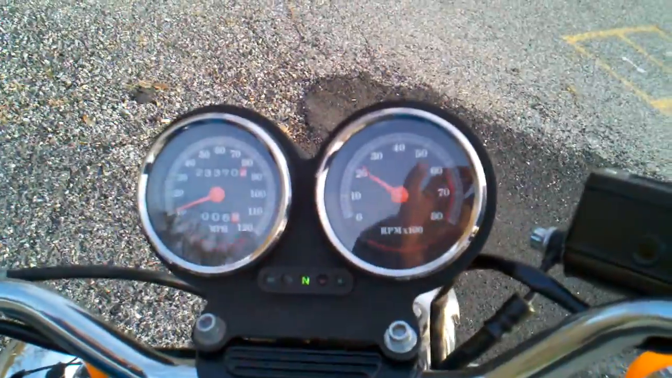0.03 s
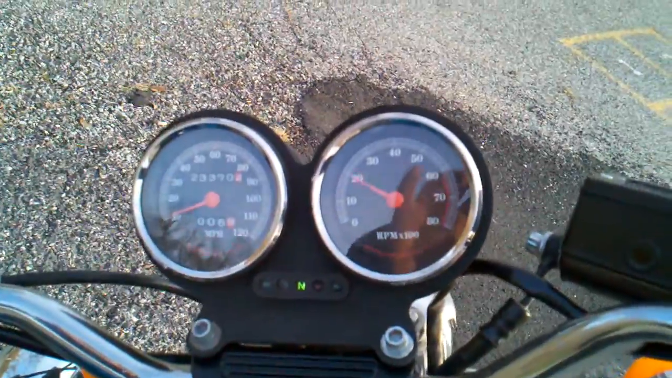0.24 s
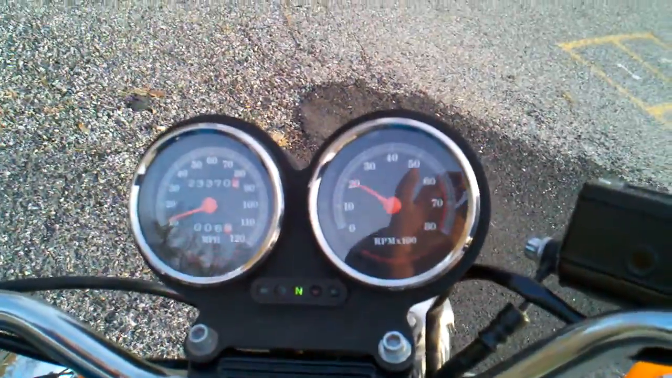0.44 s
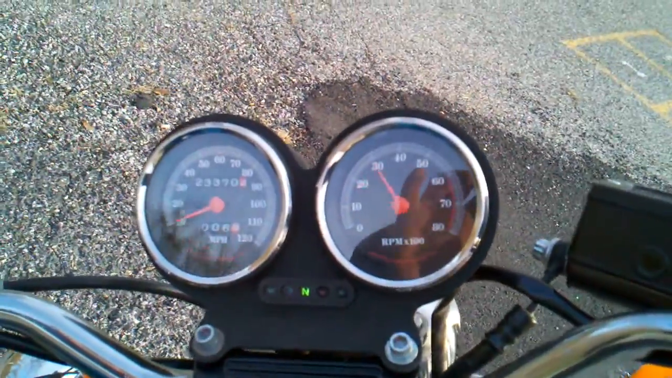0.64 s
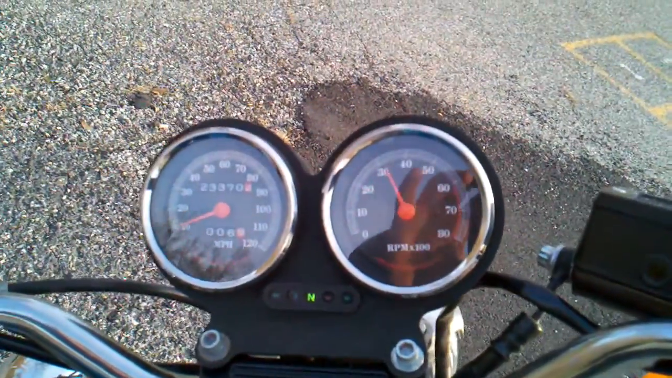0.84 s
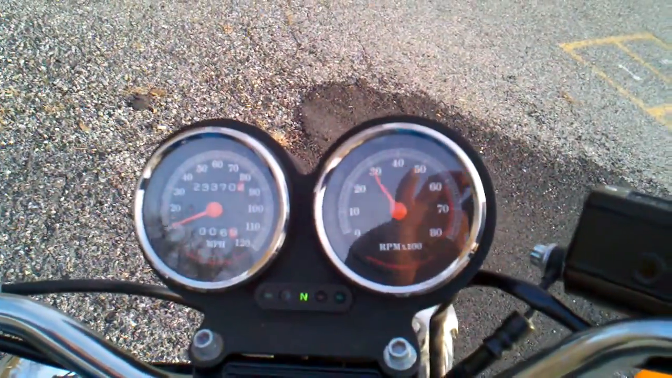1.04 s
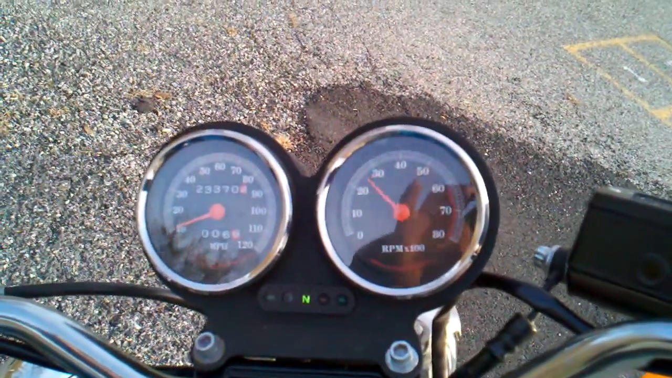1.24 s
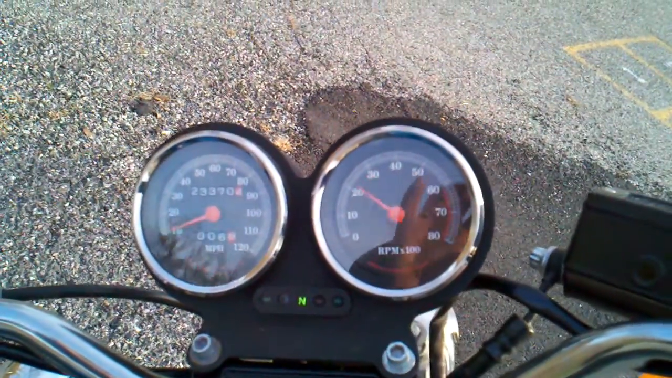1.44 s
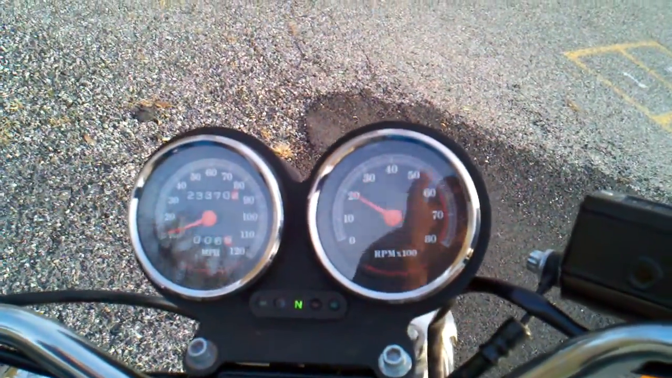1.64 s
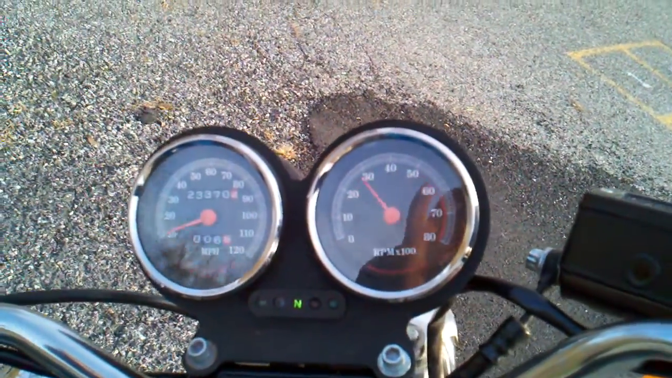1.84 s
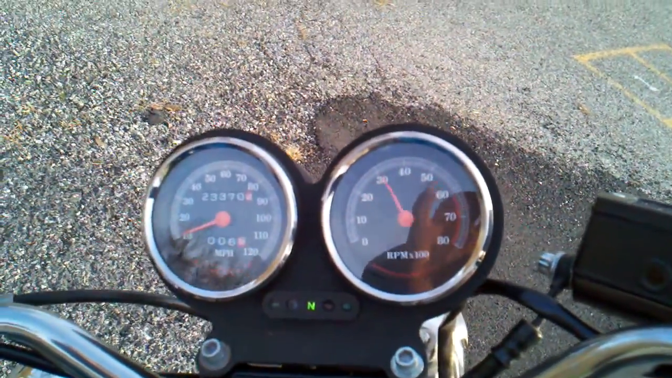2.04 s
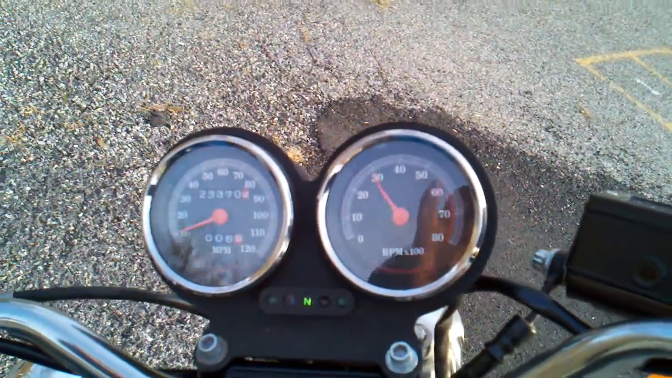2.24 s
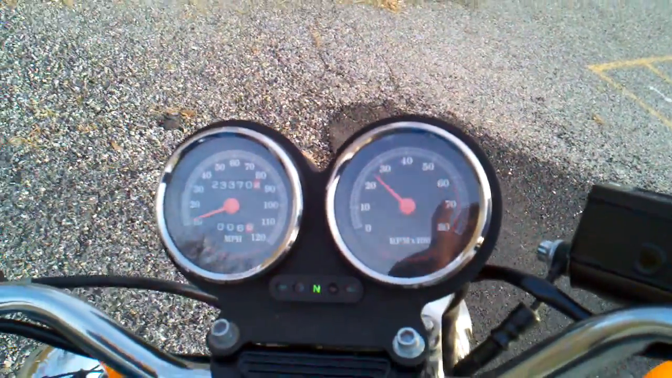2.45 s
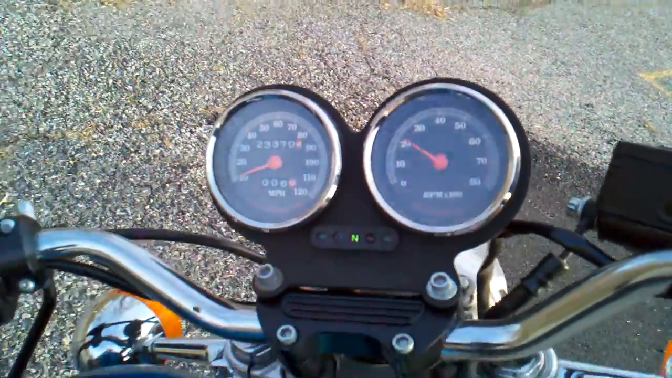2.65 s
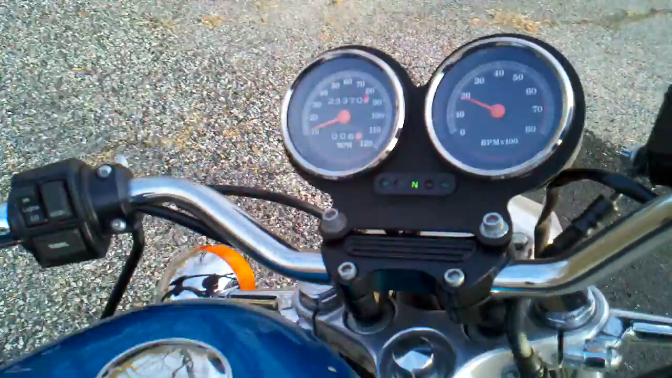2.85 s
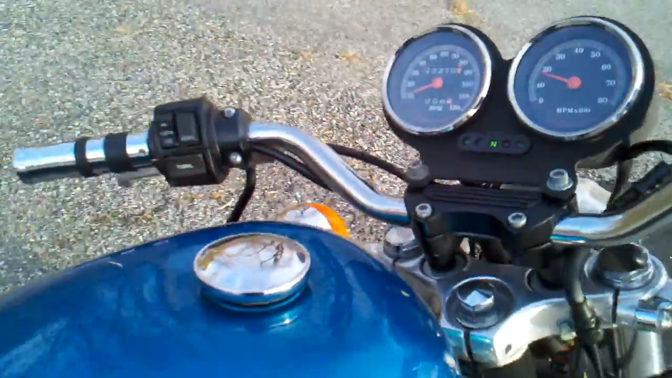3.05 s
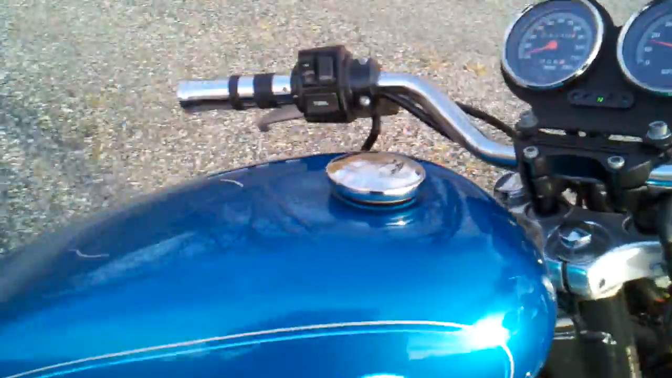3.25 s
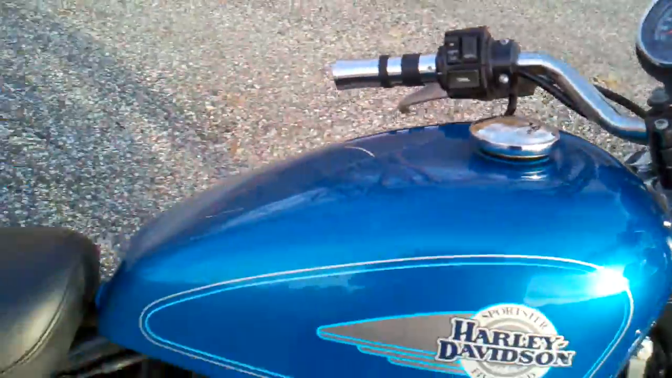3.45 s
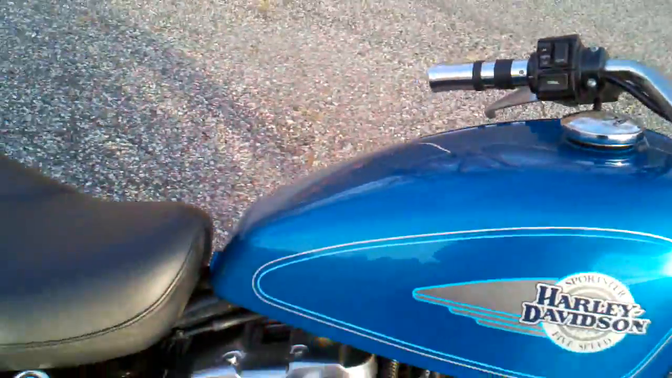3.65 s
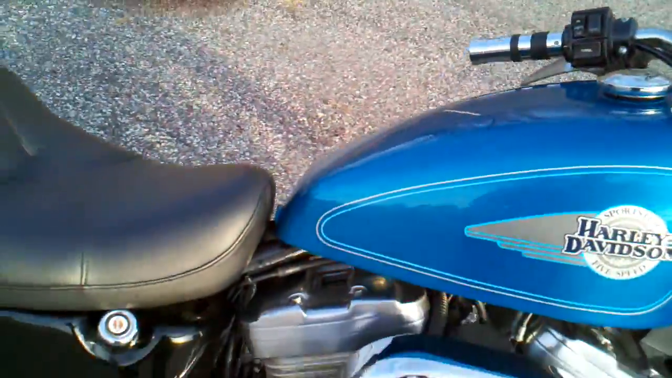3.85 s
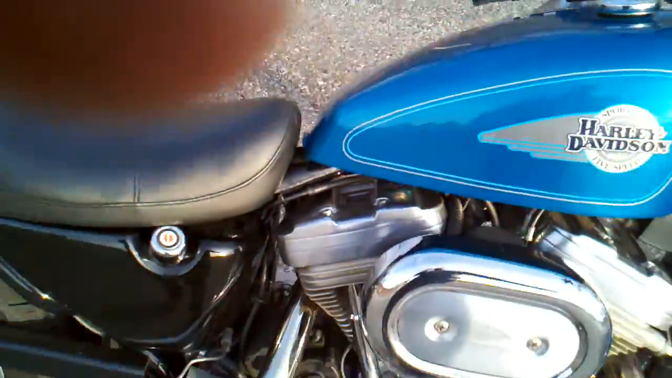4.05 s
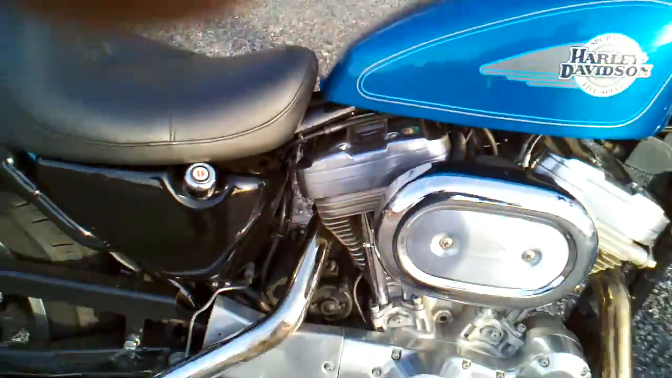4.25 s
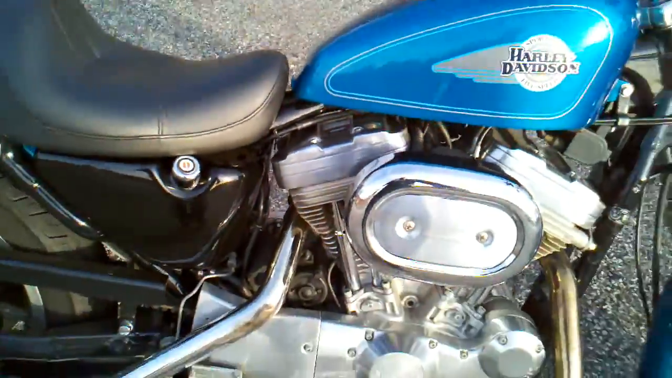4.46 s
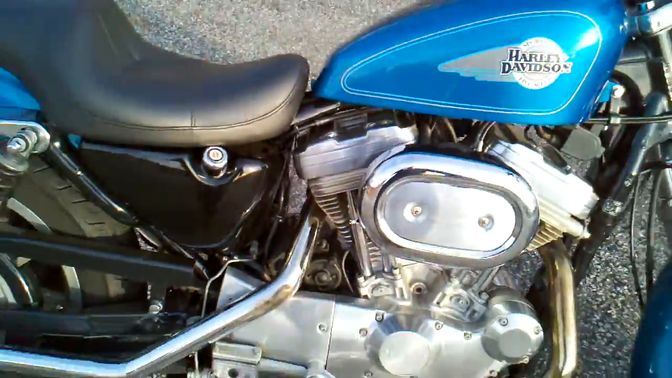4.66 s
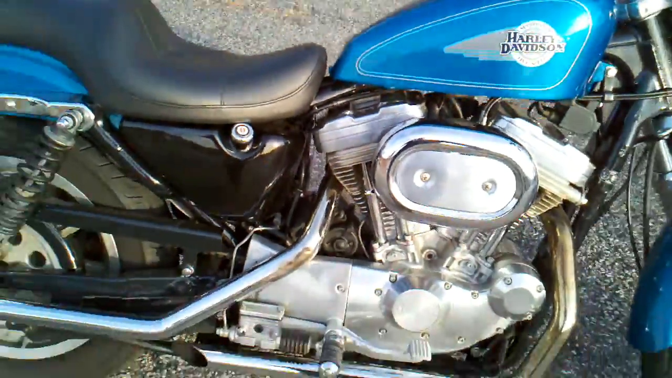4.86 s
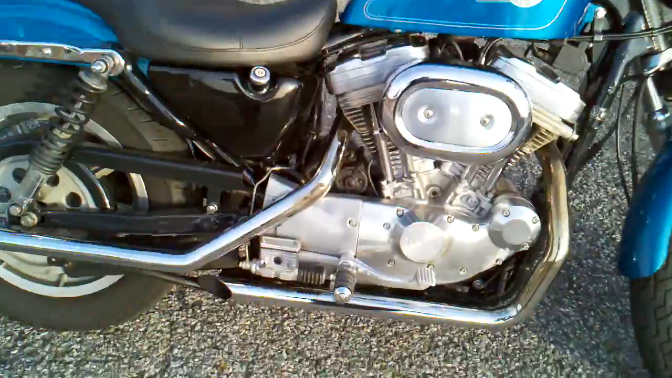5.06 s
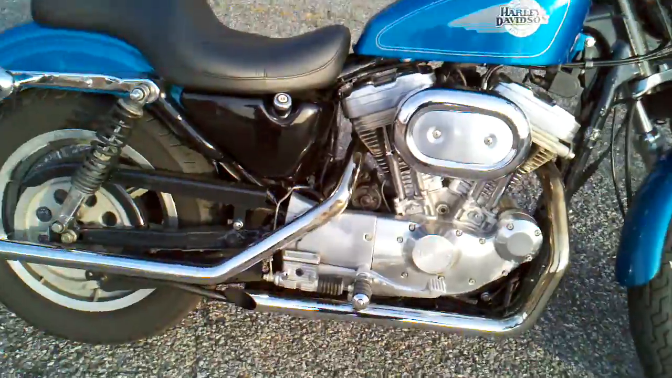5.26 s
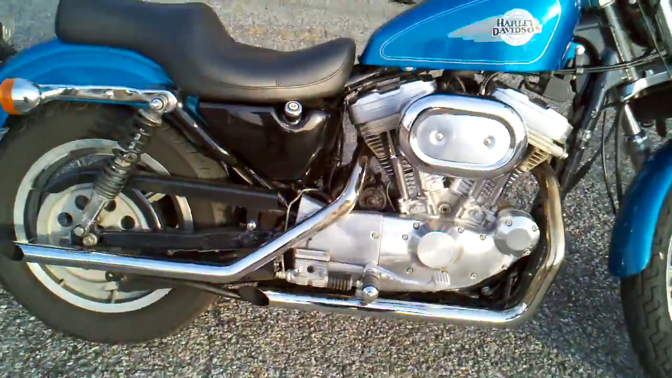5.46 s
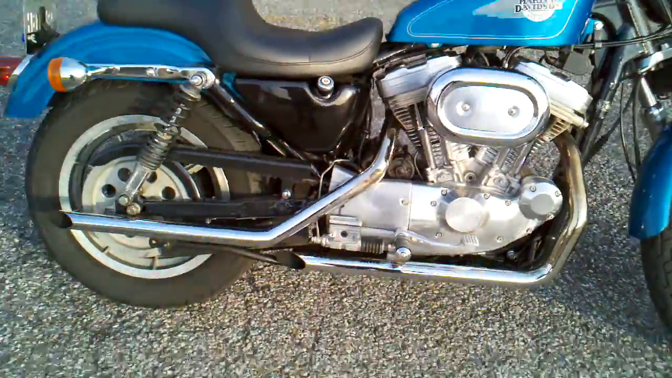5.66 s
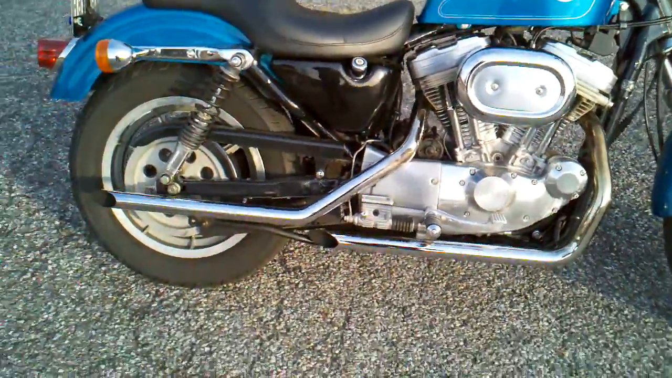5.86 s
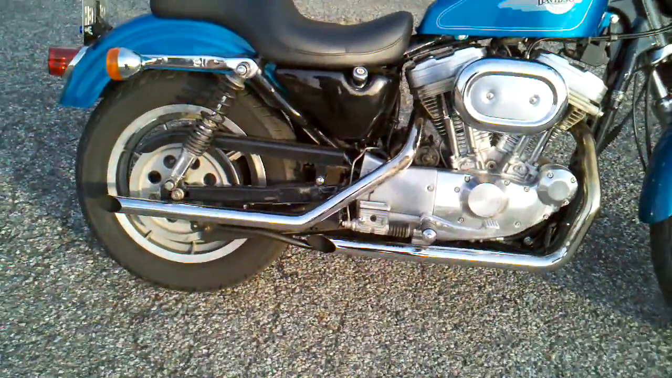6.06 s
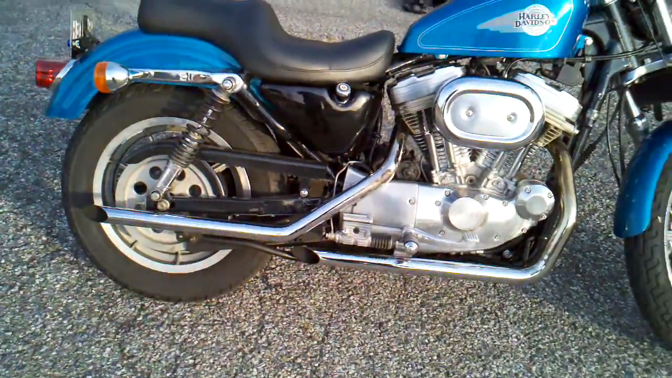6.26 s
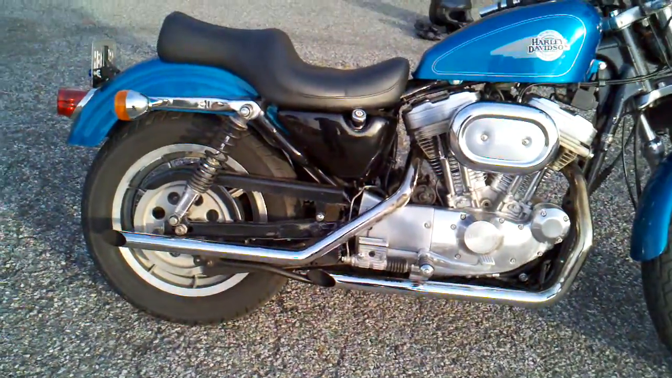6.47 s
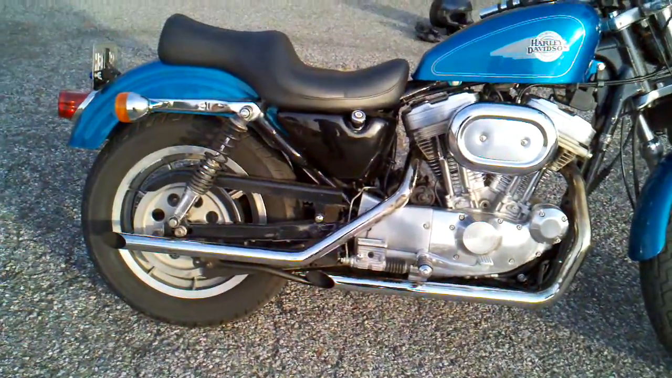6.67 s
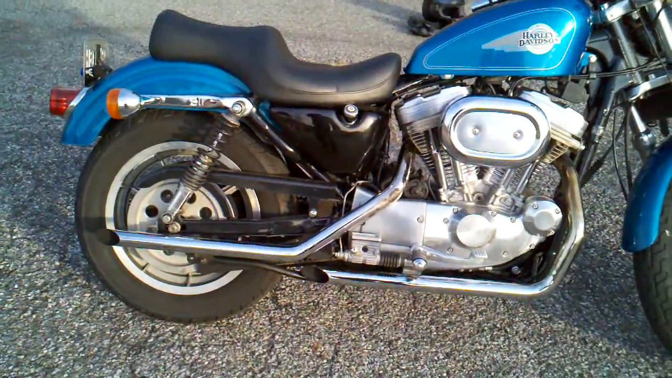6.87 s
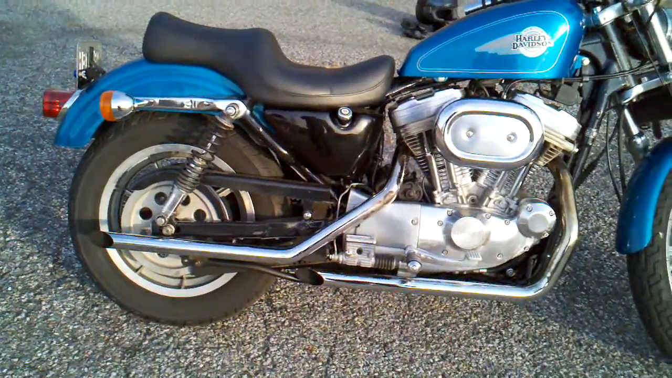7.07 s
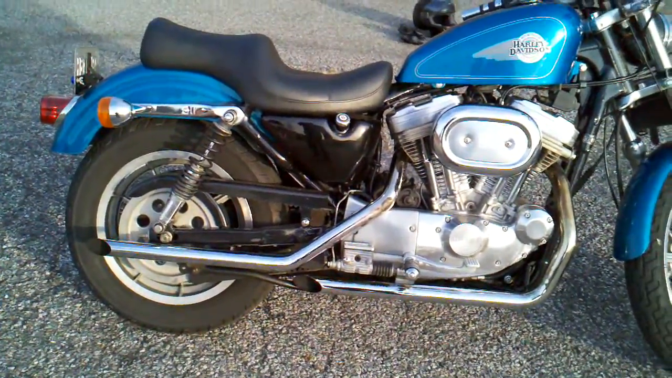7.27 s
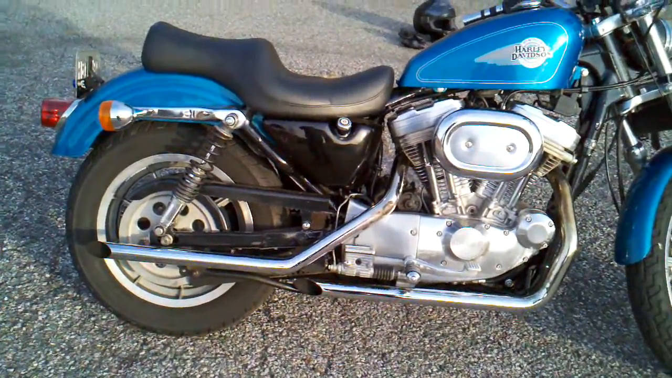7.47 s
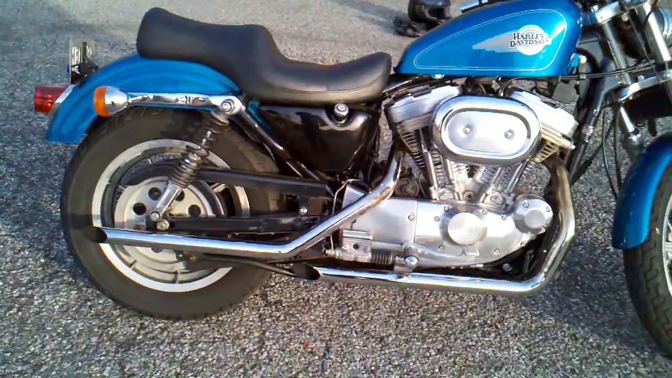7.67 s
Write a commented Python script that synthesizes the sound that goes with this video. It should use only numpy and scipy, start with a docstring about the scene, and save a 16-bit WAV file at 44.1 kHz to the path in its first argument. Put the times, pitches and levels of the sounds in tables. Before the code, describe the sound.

Close motorcycle engine: two short throttle barks with popping run-down, then a slow uneven idle thumping and hissing from the exhaust pipes.

```python
"""A V-twin motorcycle engine in an open parking lot: two throttle blips, a long fall in speed, then a loping idle.
Crank-timed pulses ring the pipes, sine orders make the drone, noise knocks ring the cases, noise bursts spit.
The listener walks close by, from between handlebar and tank round to the exhaust side, where the pipes thump.
Two microphone ports make a left and a right beam: each port minus the other, delayed."""
import sys
import numpy as np
from scipy import signal
from scipy.fft import rfft, irfft
from scipy.io import wavfile
from scipy.ndimage import uniform_filter1d

SR = 44100
rng = np.random.default_rng(int(sys.argv[2]) if len(sys.argv) > 2 else 0)


def persist_wave(psi):
    """Save psi, clipped to +-1, as 16-bit WAV."""
    counts = np.round(np.clip(psi, -1, 1) * 32767).astype(np.int16)
    wavfile.write(sys.argv[1], SR, np.atleast_2d(counts).T)


N = 340893


def from_db(db):
    """Gain of a level in dB."""
    return 10 ** (np.asarray(db) / 20)


def rms_one(x):
    """Scaled to rms 1."""
    return x / np.sqrt(np.mean(x ** 2) + 1e-20)


def in_time(rows):
    """The columns of a curve table at every sample."""
    s, *columns = np.transpose(rows)
    return [np.interp(np.arange(N) / SR, s, column) for column in columns]


def noise(spectrum):
    """Noise of the given colour, rms 1."""
    hz, db = np.transpose(spectrum)
    bins = np.arange(1, N // 2 + 2) * SR / N
    gain = from_db(np.interp(np.log(bins), np.log(hz), db))
    return rms_one(irfft(rfft(rng.standard_normal(N)) * gain, N))


def cut(x, hz, kind, order=2):
    """Butterworth filter: low-pass, high-pass or band-pass."""
    return signal.sosfilt(signal.butter(order, hz, kind, fs=SR, output="sos"), x)


def resonance(x, hz, width_hz):
    """Two-pole resonance of gain 1 on top."""
    r = np.exp(-np.pi * width_hz / SR)
    feedback = [1, -2 * r * np.cos(2 * np.pi * hz / SR), r * r]
    return signal.lfilter(np.array([1, 0, -1]) * (1 - r * r) / 2, feedback, x)


# Engine speed. Each row: time in seconds, speed in rpm.
ENGINE_SPEED = [(0.0, 2150.0), (0.24, 1970.0), (0.51, 2494.0), (0.66, 3476.0), (1.0, 2837.0), (1.5, 1788.0),
                (1.62, 2692.0), (1.74, 2386.0), (1.87, 3487.0), (2.19, 2723.0), (2.69, 1946.0),
                (3.08, 1447.0), (3.78, 1041.0), (4.24, 918.0), (5.09, 884.0), (5.48, 941.0), (6.22, 906.0),
                (6.45, 763.0), (6.55, 924.0), (7.73, 904.0)]
START_CYCLE = -.035   # four-stroke cycles done at the start


def crank():
    """Cycles done and cycles per second; the flywheel smooths the speed."""
    rate = uniform_filter1d(in_time(ENGINE_SPEED)[0] / 120, size=3000, mode="nearest")
    return START_CYCLE + np.cumsum(rate) / SR, rate


def idle(rate):
    """How far the engine idles (0-1): fully at 9 cycles per second, not at all from 16."""
    return np.clip((16 - rate) / 7, 0, 1)


# Throttle blips. Each row: opening time in seconds, shutting time in seconds.
THROTTLE_BLIPS = [(.3, .66), (1.56, 1.87)]


def throttle(s):
    """How far the engine pulls (0-1): it takes hold in a tenth of a second and lets go in 20 ms."""
    return sum(np.clip((s - opens) / .1, 0, 1) * np.clip((shuts - s) / .02, 0, 1)
               for opens, shuts in THROTTLE_BLIPS)


# The idle burns rich every other cycle and skips a beat here. Each entry: cycle number.
SKIPPED_BEATS = [90, 97]


def burns(cycles, rate):
    """For each cycle: its number, how far it idles, burns rich and pulls (0-1)."""
    whole = np.arange(101)
    s = np.interp(whole, cycles, np.arange(N) / SR)
    idling = idle(np.interp(whole, cycles, rate))
    skipped = np.searchsorted(SKIPPED_BEATS, whole, "right")
    rich = idling * ((whole + skipped) % 2 == 0)
    return whole, idling, rich, throttle(s)


# Pressure pulses in a cycle. Each row: share of the cycle, relative level in dB at speed, the same at idle,
# dB added on a rich idle cycle, share of the cycle added on a rich idle cycle.
PRESSURE_PULSES = [(-.02, -4, -9, -2, 0), (.2, -15, -30, 0, 0), (.24, -22, -1, 2, .015),
                   (.4, -9, -14, 6, .02), (.5, -30, -30, 0, 0), (.7, -16, -2, 1, .01), (.86, 0, -30, 0, 0)]
REAR_SHARE = .5   # the row of the rear cylinder


def pulse_train(cycles, rate, uneven_db):
    """One click for each pressure pulse, no two burns alike, evened out to a steady running rms."""
    clicks = np.zeros(N)
    whole, idling, rich, pulling = burns(cycles, rate)
    for share, fast_db, idle_db, rich_db, rich_share in PRESSURE_PULSES:
        chance = rng.standard_normal((len(whole), 2))
        jitter = (.004 + .004 * idling) * chance[:, 0]
        at = np.searchsorted(cycles, whole + share + rich * rich_share + jitter)
        level_db = fast_db + idling * (idle_db - fast_db) + rich * rich_db + uneven_db * chance[:, 1]
        level_db += pulling * (38 if share == REAR_SHARE else 0)   # the rear cylinder barks under load
        inside = at < N
        clicks[at[inside]] += from_db(level_db[inside])
    clicks[0] = 0   # pulses before the start all land here
    return clicks / np.sqrt(uniform_filter1d(clicks ** 2, size=12000) + 1e-9)


def gate(clicks, decay_ms):
    """Each click opens a gate that swells and closes again, rms 1."""
    r = np.exp(-1000 / (decay_ms * SR))
    return rms_one(signal.lfilter([1], [1, -2 * r, r * r], clicks + 1e-18))


# Pipe resonances. Each row: frequency in Hz, width in Hz, relative level in dB.
PIPE_RESONANCES = [(96, 36, 4.5), (141, 73, -1.5), (200, 60, -7), (290, 50, -4), (703, 36, -23),
                   (1110, 190, -28)]


def exhaust(clicks):
    """Blunt suction-first pulses, a little turbulent, ring the pipes."""
    turbulence = gate(clicks, 4.0) * rng.standard_normal(N)
    blunt = rms_one(cut(-clicks, 900, "low")) + .2 * turbulence
    return sum(from_db(db) * resonance(blunt, hz, width) * (-1) ** k
               for k, (hz, width, db) in enumerate(PIPE_RESONANCES))


# Idle thumps in a cycle. Each row: share of the cycle, relative level in dB, dB added on a rich cycle.
IDLE_THUMPS = [(.02, -3, -3), (.155, -13, -2), (.29, 0, 1), (.46, -15, 12), (.73, -4, 2)]
THUMP_MS, THUMP_RICH_SHARE = 1.35, .018   # width, lateness on a rich cycle
STUMBLE_DB = -8   # the cycle of the first skipped beat thumps weakly
# The first thump of a cycle rings a hollow of its own, less on a rich cycle.
GULP_HZ, GULP_WIDTH_HZ, GULP_DB, GULP_RICH_DB = 230, 15, 11.5, -14
# The long pipe sings after each thump, fed by gas flow between.
NOTE_HZ, NOTE_WIDTH_HZ, NOTE_DB, NOTE_AIR_DB = 297, 12, 14.5, -10
BOOM_HZ, BOOM_WIDTH_HZ, BOOM_DB = 103, 25, 3   # the lowest ring of the pipes


def thumps(cycles, rate, uneven_db):
    """At idle each pulse leaves the pipe as a puff and a suck; it sets the pipe note, boom and hollow ringing."""
    clicks, gulps = np.zeros((2, N))
    whole, idling, rich, _ = burns(cycles, rate)
    for share, db, rich_db in IDLE_THUMPS:
        chance = rng.standard_normal((len(whole), 2))
        at = np.searchsorted(cycles, whole + share + rich * THUMP_RICH_SHARE + .005 * chance[:, 0])
        stumble_db = STUMBLE_DB * (whole == SKIPPED_BEATS[0])
        size = idling ** 2 * from_db(db + rich * rich_db + uneven_db * chance[:, 1] + stumble_db)
        inside = at < N
        clicks[at[inside]] += size[inside]
        if share == IDLE_THUMPS[0][0]:
            gulps[at[inside]] = (size * from_db(GULP_DB + rich * GULP_RICH_DB))[inside]
    x = np.arange(-400, 401) * 1000 / (THUMP_MS * SR)
    puff_and_suck = -x * np.exp(-x * x / 2)
    puffs, gulps = signal.oaconvolve(np.array([clicks, gulps]), puff_and_suck[None], "same", axes=1)
    air = from_db(NOTE_AIR_DB) * rng.standard_normal(N) * idle(rate)
    hollow = resonance(gulps, GULP_HZ, GULP_WIDTH_HZ)
    boom = from_db(BOOM_DB) * resonance(puffs, BOOM_HZ, BOOM_WIDTH_HZ)
    note = from_db(NOTE_DB) * resonance(puffs + air, NOTE_HZ, NOTE_WIDTH_HZ)
    return puffs + hollow + boom + note


FIRST_ORDER, LAST_ORDER = 3, 26   # multiples of the cycle rate
DRONE_SLIP = .045   # unsteady burning shifts the phase: radians per order
DRONE_WAVER_DB = 4   # each order wavers, most when the engine turns slowly
# Low orders of the drone, one row each from the first order up, before the fall with frequency.
# Each row: relative level in dB at 8, 10, 13, 18, 22 and 26 cycles per second.
LOW_ORDERS = [(-30, -30, -24, -16, -10, -5), (-28, -28, -7, 0, 3, 2), (-22, -22, -10, 6, -2, -6),
              (-20, -20, -4, -11, -9, -6), (-20, -10, -4, -11, -12, -3), (-20, -20, -16, -14, -18, -12),
              (-18, 4, -15, -5, -20, -22), (-10, -20, -18, -14, -15, -11), (-6, -5, -9, -12, -5, -7)]
# Higher orders swell as they pass two pipe resonances. Each row: frequency in Hz, relative level in dB.
GROWL_RESONANCES = [(220, -16), (285, -1), (325, 0), (365, -9), (420, -3), (470, 3), (515, -12), (590, -7),
                    (700, -16)]
# Growl against engine speed. Each row: cycles per second, level added in dB.
GROWL_WITH_SPEED = [(10, -18), (16, -9), (22, 0)]


def drone(cycles, rate):
    """Clean orders of the cycle rate; their pressure falls with frequency and their balance shifts with speed."""
    out, samples, steps = 0, np.arange(N), np.arange(0, N + 256, 256)
    coarse = np.interp(steps, samples, rate)
    slowness = np.clip((24 - coarse) / 8, .5, 1)
    for k, order in enumerate(range(FIRST_ORDER, LAST_ORDER + 1)):
        slip = DRONE_SLIP * order * np.interp(samples, np.arange(200) * SR / 25, rng.standard_normal(200))
        waver = np.interp(steps, np.arange(80) * SR / 10, rng.standard_normal(80)) * slowness
        if k < len(LOW_ORDERS):
            db = np.interp(coarse, [8, 10, 13, 18, 22, 26], LOW_ORDERS[k])
        else:
            db = np.interp(order * coarse, *np.transpose(GROWL_RESONANCES))
            db = db + np.interp(coarse, *np.transpose(GROWL_WITH_SPEED))
        gain = from_db(db + DRONE_WAVER_DB * waver) / (order * coarse)
        phase = 2 * np.pi * (order * cycles + rng.random()) + slip
        out = out + np.interp(samples, steps, gain) * np.sin(phase)
    return out


# The listener's walk. Each row: time in seconds, lag of the back port in samples, level of its late lows in dB,
# place (0 handlebar, 1 tank, 2 and beyond exhaust side).
WALK = [(0, 11.1, -1.4, 0.53), (2.5, 11.1, -1.5, 0.42), (3.299, 10.7, -1, 0.94), (4, 11.5, -1.5, 1.46),
        (5, 7.3, -1.1, 1.8), (7.73, 4, -0.71, 3.9)]


def by_place(db, s):
    """A level given for the three places, followed along the walk."""
    walk = np.transpose(WALK)
    return np.interp(np.interp(s, walk[0], walk[3]), range(3), db)


# Spits with set times and levels, loud and faint.
# Each row: time in seconds, relative level in dB of the high part, the same of the low part.
SET_SPITS = [(0.4266, -19, -20), (0.479, -20, -20.5), (0.569, -19, -20), (0.734, -28, -17.5),
             (0.77, -25, -16.5), (0.8062, -16, -17.5), (0.841, -16.5, -18.5), (0.882, -26, -18.5),
             (0.921, -19, -22), (0.966, -42, -29), (1.097, -39, -39), (1.191, -42, -35), (1.243, -33, -31),
             (1.294, -48, -36), (1.351, -30, -28.5), (1.7, -21, -23.5), (1.7246, -22, -29),
             (1.7508, -15, -22), (1.7962, -14, -22.5), (1.836, -22, -26.5), (1.922, -19, -17.5),
             (1.962, -19, -16.5), (1.9984, -14, -15.5), (2.037, -22, -15.5), (2.0763, -32, -17.5),
             (2.117, -26, -19.5), (2.157, -38, -24.5), (2.289, -35, -28), (2.388, -35, -34),
             (2.49, -28, -38), (2.548, -39, -40), (2.666, -34, -32), (2.796, -37, -39), (2.936, -40, -37),
             (3.172, -29, -34), (3.347, -28, -33), (3.872, -22.5, -35.5), (4.047, -27.5, -40),
             (4.249, -31, -29.5), (4.301, -42, -32.5), (4.376, -22, -29), (4.434, -34, -32),
             (4.51, -25, -25.5), (4.565, -23, -29.5), (4.64, -20.5, -26), (4.703, -25.5, -33),
             (4.776, -16, -28), (4.8325, -19.5, -31.5), (4.911, -16, -26.5), (4.972, -28, -28.5),
             (5.1029, -18, -23.5), (5.176, -25, -27), (5.239, -18, -28.5), (5.315, -29, -26),
             (5.368, -24, -29), (5.441, -20, -27), (5.502, -25, -31.5), (5.627, -19, -29),
             (5.702, -23.5, -29.5), (5.763, -19.5, -31), (5.887, -10, -27.5), (5.9615, -13.5, -28),
             (6.0212, -18, -28), (6.091, -24.5, -33), (6.15, -10.5, -28), (6.223, -23, -25.5),
             (6.283, -17, -30.5), (6.364, -27, -26.5), (6.428, -24.5, -34), (6.5127, -17.5, -21.5),
             (6.5724, -15, -24), (6.6424, -10.5, -25.5), (6.703, -21.5, -32), (6.773, -23, -28.5),
             (6.8303, -12, -24), (6.904, -23.5, -24.5), (6.966, -17.5, -26.5), (7.035, -28, -30),
             (7.0934, -13, -24.5), (7.166, -40, -30.5), (7.302, -28, -28.5), (7.368, -45, -53),
             (7.434, -29, -32), (7.4896, -17.5, -26.5), (7.562, -15.5, -23.5), (7.623, -18.5, -25.5)]
# When gas spits from the pipe mouths. Each row: share of the cycle at idle (rounded to half cycles at speed),
# share added on a rich idle cycle, dB added off throttle at speed.
SPIT_TIMING = [(-.04, .03, 0), (.44, -.03, -30)]
# High part of the everyday spits against the clatter. Each entry: dB at the handlebar, tank, exhaust side.
SPIT_HIGH_BY_PLACE = [0, -8.5, 2.5]
# Low part of the everyday spits against the clatter. Each entry: dB at the handlebar, tank, exhaust side.
SPIT_LOW_BY_PLACE = [-39, -25.5, -6]
SPIT_HIGH_FAST_DB, SPIT_LOW_FAST_DB = -1, 5   # added at full speed
SPIT_UNEVEN_DB = 9   # spread from spit to spit of the high part; the low part spreads 2.5 times as far


def spit_rows(cycles, rate, clatter_db):
    """Each pipe spits unevenly once a cycle; the set spits take the place of the everyday spits near them."""
    whole, idling, rich, pulling = burns(cycles, rate)
    rows, set_rows = [], np.array(SET_SPITS)
    for share, rich_share, coast_db in SPIT_TIMING:
        when = whole + idling * share + (1 - idling) * round(2 * share) / 2 + rich * rich_share
        at = np.minimum(np.searchsorted(cycles, when), N - 1)
        s = at / SR
        fast = np.clip(rate[at] / 8 - 2.5, 0, 1)
        base = clatter_db[at] + coast_db * (1 - np.maximum(idling, pulling))
        uneven = SPIT_UNEVEN_DB * np.clip(rng.standard_normal((len(at), 2)), -3, 1)
        high_db = base + SPIT_HIGH_FAST_DB * fast + by_place(SPIT_HIGH_BY_PLACE, s) + uneven[:, 0]
        low_db = base + SPIT_LOW_FAST_DB * fast + by_place(SPIT_LOW_BY_PLACE, s) + 2.5 * uneven[:, 1]
        rows += zip(s, high_db, low_db)
    rows = np.array(rows)
    distance_s = np.abs(rows[:, :1] - set_rows[:, 0]).min(axis=1)
    free = (distance_s > .015) & (rows[:, 0] > .01)
    return np.vstack([set_rows, rows[free]])


# Colour of the high part of the spits. Each row: frequency in Hz, relative density in dB.
SPIT_HIGH_COLOUR = [(3500, -15), (5500, -4.5), (7500, 16), (9000, 14), (11500, 5.5), (13500, -4.5)]
# Colour of the low part of the spits. Each row: frequency in Hz, relative density in dB.
SPIT_LOW_COLOUR = [(900, 0), (1700, 1.5), (2300, 3), (3000, 3.5), (4000, -2), (6000, -10.5)]
SPIT_COLOUR_DB = 2.2   # each spit has its own colour: spread of its five bands


def spits(rows, column, spectrum, rise_ms, fall_ms, lead_s=0.00076):
    """Short bursts of turbulent gas: noise bands that swell and die away, with a faint tail."""
    marks, edges = np.zeros((5, N)), np.geomspace(spectrum[0][0] / 2, 15000, 6)
    colour_db = SPIT_COLOUR_DB * rng.standard_normal((len(rows), 5))
    colour_db = colour_db.T - colour_db.mean(axis=1)
    marks[:, ((rows[:, 0] - lead_s) * SR).astype(int)] = from_db(rows[:, column] + colour_db)
    air = noise(spectrum)
    bands = np.array([cut(air, pair, "band") for pair in zip(edges, edges[1:])])
    ms = np.arange(1500) * 1000 / SR
    fall = np.exp(-(ms / fall_ms) ** 2) + 0.044 * np.exp(-ms / 12)
    shape = (1 - np.exp(-ms / rise_ms)) ** 2 * fall
    envelopes = signal.oaconvolve(marks, shape[None] / shape.max(), axes=1)[:, :N]
    gas = np.sum(envelopes * bands, axis=0)
    return np.sqrt(np.mean(gas ** 2)) * beams(gas, shadow_db=-6, scatter_ms=3.0)   # keeps its own level


# Ringing cases, tank and frame. Each row: frequency in Hz, width in Hz,
# relative level in dB at the handlebar, at the tank, at the exhaust side.
RINGING_CASES = [(265, 53.5, -0.5, 8.5, 1.5), (436.5, 82, 4, 8.5, 3.5), (457, 47.4, 1, 10, 3.5),
                 (678, 206, -6, 7.5, 5.5), (1150, 228, 0.5, -2, 3), (1856, 680, -5.5, -1, 3),
                 (2268, 620, -13, -7, 1.5), (3264, 570, -16.5, -14, -9)]
# Under 500 Hz: coasting fast, the cases rattle less and leave room for the drone; under throttle, more.
CASES_FAST_DB, CASES_PULL_DB = -11, 1.5
REPEAT_SHARE = .55   # at speed this share of the knocks' power comes round alike every cycle


def clatter(clicks, cycles, rate):
    """Dense knocks of valve gear, swelling with every pulse, ring the cases; the walk changes which are heard."""
    place = in_time(WALK)[2]
    share = REPEAT_SHARE * np.clip(rate / 8 - 1.5, 0, 1)
    pattern = rng.standard_normal(1600)[(cycles % 1 * 1600).astype(int)]
    knocks = np.sqrt(1 - share) * rng.standard_normal(N) + np.sqrt(share) * pattern
    knocks *= 1 + np.interp(rate, [9, 18], [.38, 1.7]) * gate(clicks, 3.0)
    pulling = throttle(np.arange(N) / SR)
    low_db = CASES_FAST_DB * np.clip(rate / 6 - 3, 0, 1) * (1 - pulling) + CASES_PULL_DB * pulling
    out = 0
    for k, (hz, width, *db) in enumerate(RINGING_CASES):
        gain = from_db(np.interp(place, range(3), db) + low_db * (hz < 500))
        out = out + gain * rms_one(resonance(knocks, hz, width)) * (-1) ** k
    return out


# Colour of the air hiss. Each row: frequency in Hz, relative density in dB.
HISS_COLOUR = [(2000, 8), (3500, -12), (5000, 4), (7000, 5), (9000, 6), (11000, 4.5), (13500, -0.5)]


def air_hiss(clicks):
    """Steady coloured noise that swells a little with the pulses."""
    return noise(HISS_COLOUR) * (1 + 0.2 * gate(clicks, 16.0))


BEAM_LAG = 17   # samples by which the subtracted port is delayed
BASS_SCATTER = .09   # share of scattered lows at the back port
LAG_BLUR = .13   # outer taps of a three-tap average: treble loss of the delayed port


def beams(front, shadow_db, scatter_ms, alike_hz=750):
    """The back port hears late lows and scattered, shadowed highs; a beam is one port minus the other delayed."""
    lag, back_db, _ = in_time(WALK)
    late = from_db(back_db) * np.interp(np.arange(N) - lag, np.arange(N), front)
    scatter = rng.standard_normal((3, 6000)) * np.exp(-np.arange(6000) * 1000 / (scatter_ms * SR))
    paths = signal.oaconvolve(front[None], scatter / np.linalg.norm(scatter[0]), axes=1)[:, :N]
    # three scattered paths fade in and out at these rates in Hz, so that no fixed echo colours the sound
    fades = np.sin(2 * np.pi * np.outer([1.3, 2.1, 3.4], np.arange(N) / SR) + [[0], [2], [4]])
    scattered = np.sqrt(2 / 3) * np.sum(fades * paths, axis=0)
    late_low, scattered_low = signal.filtfilt(*signal.butter(2, alike_hz, fs=SR), [late, scattered])
    back = late_low + BASS_SCATTER * scattered_low + from_db(shadow_db) * (scattered - scattered_low)
    blurred = signal.lfilter([LAG_BLUR, 1 - 2 * LAG_BLUR, LAG_BLUR], [1], [back, front])
    # the blur itself delays by one sample
    pair = np.array([front, back]) - np.roll(blurred, BEAM_LAG - 1, axis=1)
    return pair / np.sqrt(np.mean(pair.mean(axis=0) ** 2))


# Load and nearness. Each row: time in seconds, then base levels in dB of clatter, exhaust and drone.
ENGINE_LEVELS = [(0, -29.5, -52, -34.5), (.26, -34.5, -42, -42.5), (.45, -28, -26, -35),
                 (.62, -26.5, -23, -27.5), (.69, -24, -56, -26), (.88, -24, -37, -29),
                 (1.38, -34.5, -44, -36.5), (1.57, -34, -37, -45.5), (1.8, -26.5, -25, -29.5),
                 (1.89, -26.5, -29.5, -28.5), (1.95, -22, -38, -26), (2.15, -25.5, -37, -29.5),
                 (2.52, -33, -50, -36.5), (2.72, -33, -62, -36), (2.88, -34.5, -45, -36.5),
                 (3.45, -35, -45, -33.5), (3.8, -35, -43.5, -39), (5.02, -36, -39.5, -32),
                 (5.57, -34, -36.5, -34), (6.24, -32.5, -34, -32), (6.48, -34, -37, -33),
                 (6.6, -31.5, -34, -32), (7.73, -31, -31.5, -30.5)]
# Air hiss against the clatter. Each entry: dB at the handlebar, tank, exhaust side.
HISS_BY_PLACE = [-9.5, -14.5, -13]
PIPES_IDLE_DB = -12   # at idle the pipes ring less and the thumps stand out
THUMP_DB = -0.5   # thumps against the base level of the exhaust


def scene():
    """Exhaust, idle thumps, drone, spitting, clatter of valve gear and cases, and air hiss."""
    clatter_db, exhaust_db, drone_db = in_time(ENGINE_LEVELS)
    cycles, rate = crank()
    clicks = pulse_train(cycles, rate, uneven_db=1.6)
    rows = spit_rows(cycles, rate, clatter_db)
    pipes_db = exhaust_db + PIPES_IDLE_DB * idle(rate)
    hiss_db = clatter_db + by_place(HISS_BY_PLACE, np.arange(N) / SR)
    idle_thumps = thumps(cycles, rate, uneven_db=1.2)

    out = from_db(pipes_db) * beams(exhaust(clicks), shadow_db=-3, scatter_ms=15)
    out += from_db(exhaust_db + THUMP_DB) * beams(idle_thumps, shadow_db=-3, scatter_ms=15)
    out += from_db(drone_db) * beams(drone(cycles, rate), shadow_db=-3, scatter_ms=15)
    out += from_db(-5.5) * spits(rows, column=1, spectrum=SPIT_HIGH_COLOUR, rise_ms=11.4, fall_ms=5.35)
    out += from_db(4.0) * spits(rows, column=2, spectrum=SPIT_LOW_COLOUR, rise_ms=6.1, fall_ms=2.82)
    out += from_db(clatter_db) * beams(clatter(clicks, cycles, rate), shadow_db=-3, scatter_ms=30)
    out += from_db(hiss_db) * beams(air_hiss(clicks), shadow_db=-2, scatter_ms=40)
    return out


# Colour of the faint rumble. Each row: frequency in Hz, relative density in dB.
RUMBLE_COLOUR = [(15, -22), (25, -14), (60, -8), (120, 3), (300, -40), (1000, -80)]
CUTOFF_HZ = 14350   # where the top ends


def record(dry):
    """The bass is cut against wind, each channel has a faint rumble of its own, a steep low-pass ends the top."""
    rumble = from_db(-50.0) * np.array([noise(RUMBLE_COLOUR), noise(RUMBLE_COLOUR)])
    bass_cut = signal.butter(3, 74, "high", fs=SR, output="sos")
    engine = signal.sosfiltfilt(bass_cut, dry)   # without delay
    return signal.sosfilt(signal.cheby2(20, 60, CUTOFF_HZ, fs=SR, output="sos"), engine + rumble)


dry = scene()
out = record(dry)
persist_wave(out)
```